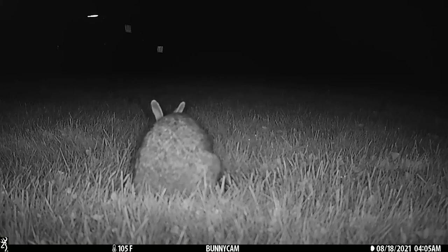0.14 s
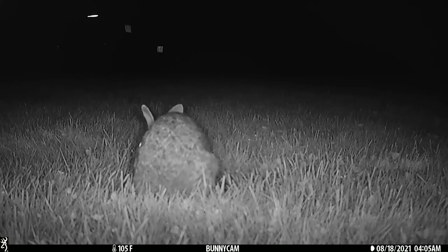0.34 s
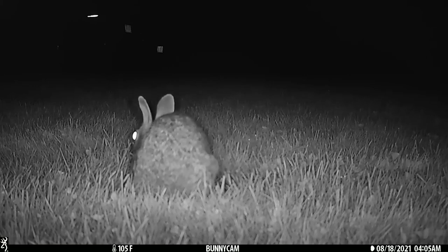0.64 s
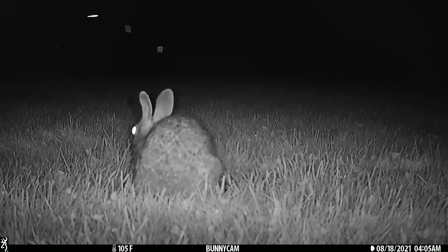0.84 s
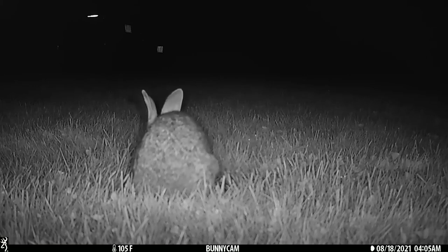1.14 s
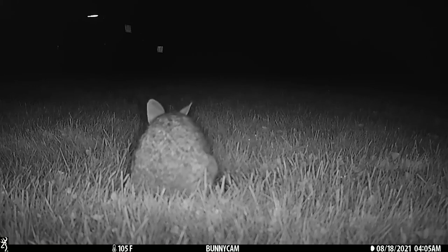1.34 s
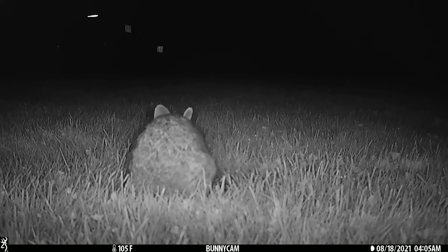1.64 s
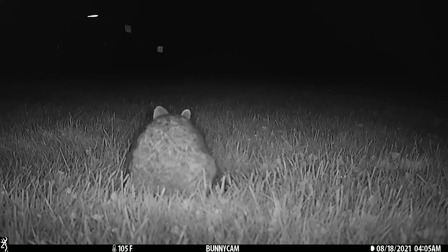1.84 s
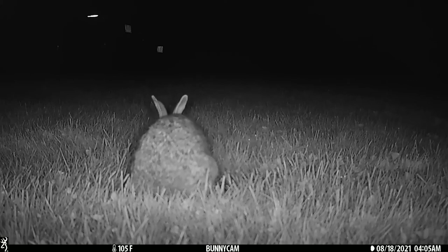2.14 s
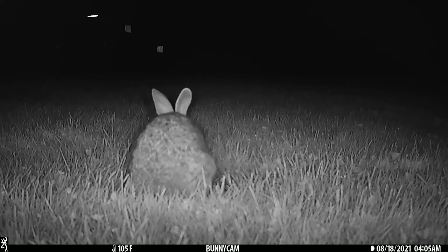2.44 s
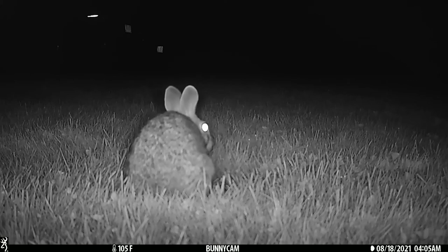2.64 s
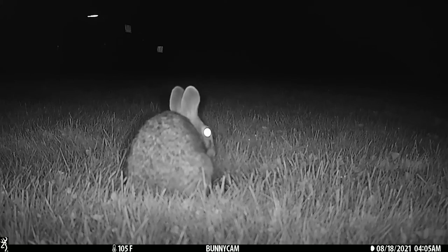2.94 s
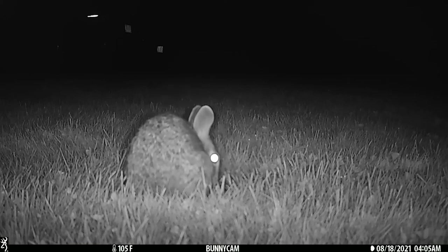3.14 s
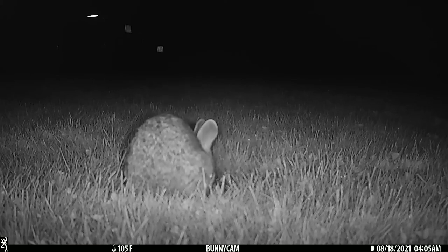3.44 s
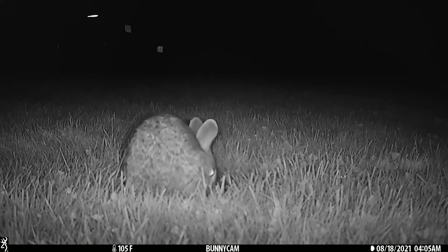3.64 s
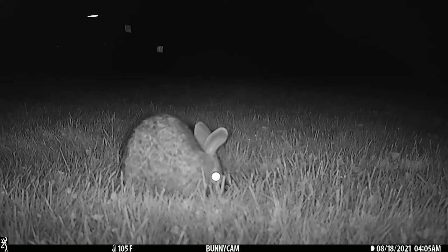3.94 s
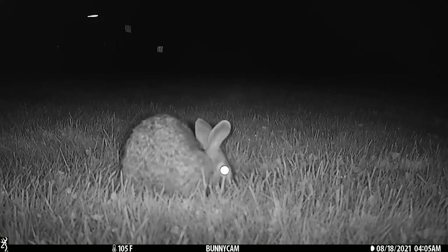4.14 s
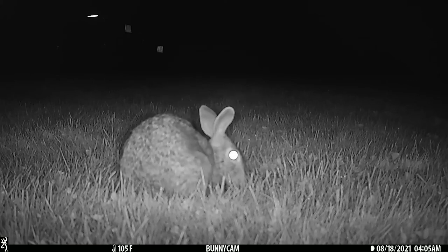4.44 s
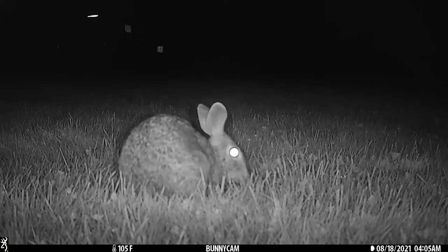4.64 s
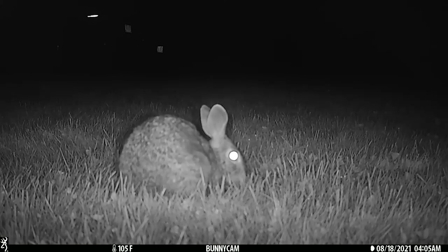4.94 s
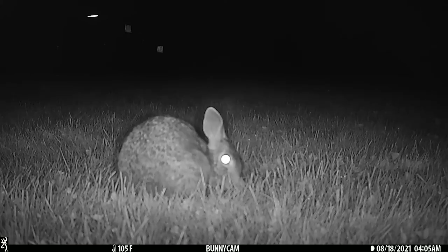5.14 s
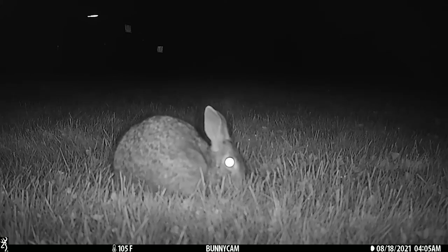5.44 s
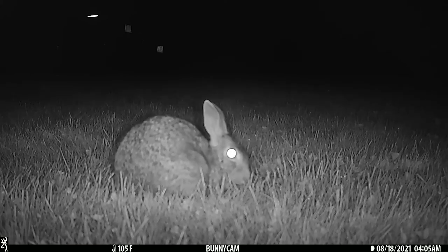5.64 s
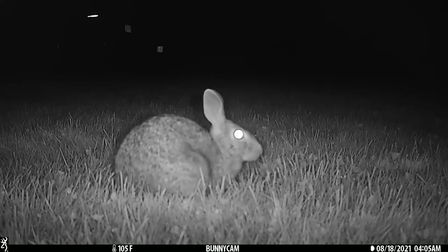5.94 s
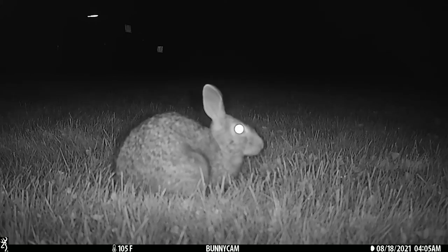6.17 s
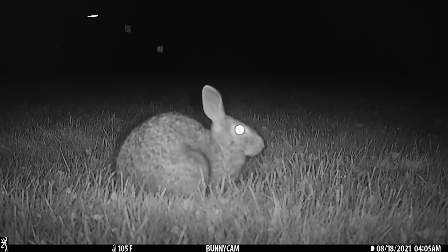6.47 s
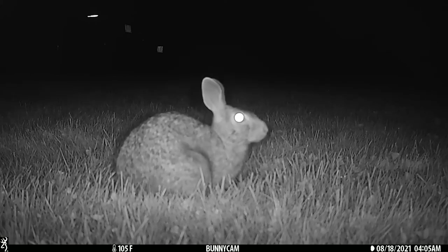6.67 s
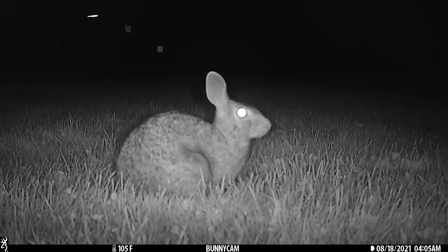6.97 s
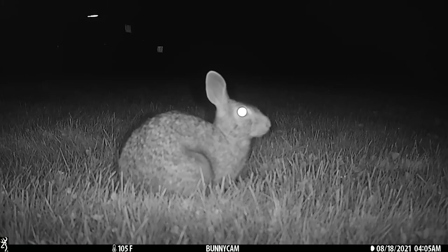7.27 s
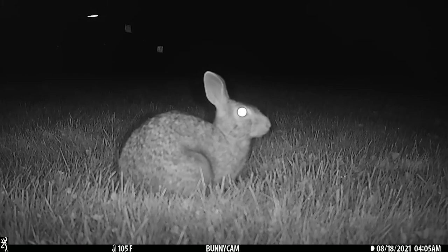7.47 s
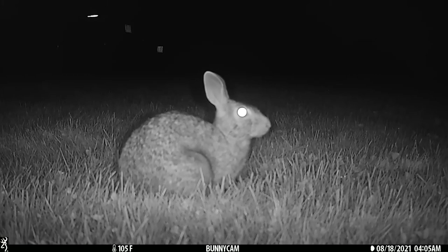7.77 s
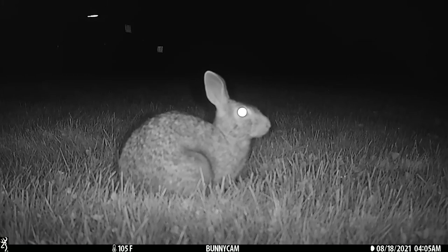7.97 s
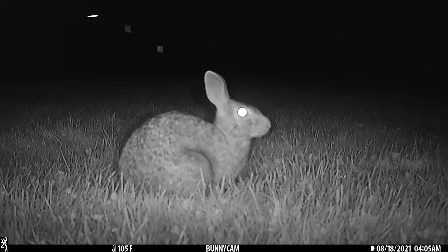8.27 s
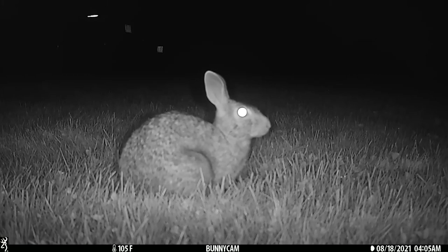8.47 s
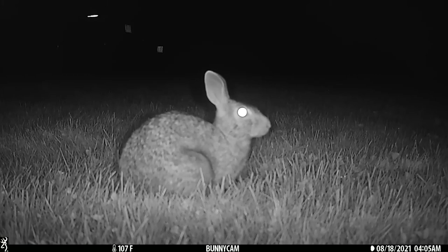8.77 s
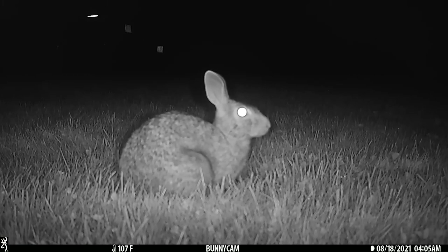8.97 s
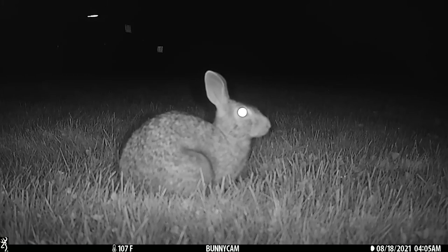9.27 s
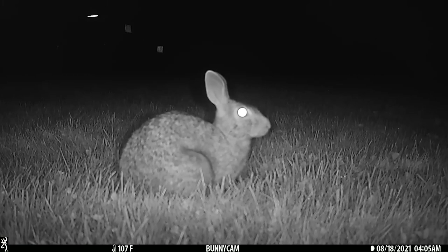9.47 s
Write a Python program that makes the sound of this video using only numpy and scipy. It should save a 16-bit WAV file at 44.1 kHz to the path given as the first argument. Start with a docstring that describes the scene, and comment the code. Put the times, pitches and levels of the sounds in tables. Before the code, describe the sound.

Steady bright cricket chirps on a night lawn, later doubled by a more distant cricket drifting in and out of step above faint hiss.

```python
"""A lawn at night, with crickets around a trail camera. A near field cricket chirps evenly, three strokes a chirp;
a second one joins farther off and drifts in and out of step, and a low-pitched one adds a few faint chirps.
Each stroke is a falling sine under a force envelope, with echoes or a diffuse tail. Behind are a distant chorus
(strokes over filtered noise), tree crickets (pulsing tones), a low rumble (filtered noise) and the camera's
hiss, buzz and whine (filtered noise and steady sines). This faint floor now and then sinks briefly."""
import sys
import numpy as np
from scipy import signal
from scipy.fft import rfft, irfft, next_fast_len
from scipy.io import wavfile

SR = 44100
rng = np.random.default_rng(int(sys.argv[2]) if len(sys.argv) > 2 else 0)


def output_pcm(signal):
    """Save a mono or channel-first signal as 16-bit PCM at the path in sys.argv[1].

    Samples are clipped to [-1, 1] before scaling.
    """
    pcm = np.clip(np.atleast_2d(signal).T, -1, 1) * 32767
    wavfile.write(sys.argv[1], SR, np.round(pcm).astype(np.int16))


N = 423801
TIME = np.arange(N) / SR


def from_db(db):
    """Logarithmic level: every 20 dB multiplies the amplitude by ten."""
    return 10 ** (np.asarray(db) / 20)


def rms_one(x):
    """Normalization of power: scale to unit rms."""
    return x / np.sqrt(np.mean(x ** 2) + 1e-20)


def colour(x, spectrum):
    """Linear filtering: weight x by a spectrum of (Hz, dB) points, joined on a log-frequency axis; rms 1."""
    hz, db = np.transpose(spectrum)
    bins = np.maximum(np.arange(N // 2 + 1) * SR / N, 1)
    gain = from_db(np.interp(np.log(bins), np.log(hz), db, left=-70, right=-70))
    return rms_one(irfft(rfft(x) * gain, N))


def drift(rate):
    """Random modulation: chance values of spread near 1, `rate` of them a second, joined by straight lines."""
    return np.interp(TIME * rate, np.arange(4096), rng.standard_normal(4096))


def add(out, start_s, sound):
    """Superposition: mix a sound into out, starting at a given time."""
    at = int(start_s * SR)
    if 0 <= at < N:
        out[at:at + len(sound)] += sound[:N - at]


def echoes(x, paths):
    """Multipath interference: delayed copies (ms, dB) add up, and on a falling pitch they beat together."""
    size = next_fast_len(N + SR)
    hz = np.arange(size // 2 + 1) * SR / size
    response = 0
    for delay_ms, db in paths:
        response = response + from_db(db) * np.exp(-2j * np.pi * hz * delay_ms / 1000)
    return irfft(rfft(x, size) * response, size)[:N]


def scatter(x, t60):
    """Diffuse scattering: grass, bushes and trees throw back a noise-like tail that decays 60 dB in t60 seconds."""
    t = np.arange(SR) / SR
    build_up = 1 - np.exp(-t / 0.039)
    tail = rng.standard_normal(SR) * from_db(-60 * t / t60) * build_up
    tail_of_unit_energy = tail / np.sqrt(np.sum(tail ** 2))
    return signal.fftconvolve(x, tail_of_unit_energy)[:N]


def stroke(pitch_hz, fall_hz, length_s, steady_share=0.4, swell=0.44):
    """Stridulation: the scraper catches at once, runs along the file and slows, most of all at the end."""
    way = np.linspace(0, 1, int(length_s * SR))
    slowing = steady_share * way + (1 - steady_share) * way ** 4
    hz = pitch_hz - fall_hz * slowing
    force = np.interp(way, [0, .03, swell, .8, 1], [0, .6, 1, .62, 0])
    return force * np.sin(2 * np.pi * np.cumsum(hz) / SR)


def near_cricket(length_s=0.0258, tail_db=-17):
    """Stridulation with multipath: three nearly pure falling strokes a chirp, cut into lobes by their echoes."""
    # The chirps. Each row: start in seconds, level in dB, usual starting pitch of its strokes in Hz.
    chirps = [(0.033, -37.5, 4372), (0.396, -37.5, 4400), (0.835, -37, 4432), (1.176, -37, 4412),
              (1.582, -36, 4402), (1.982, -36.5, 4445), (2.401, -36.5, 4396), (2.750, -37.5, 4404),
              (3.211, -37.5, 4380), (3.590, -37, 4403), (3.955, -36.5, 4360), (4.324, -37.5, 4454),
              (4.722, -36.5, 4432), (5.098, -38.3, 4406), (5.468, -36.9, 4337), (5.808, -37.5, 4400),
              (6.202, -38, 4370), (6.535, -37.5, 4397), (6.894, -37.5, 4415), (7.253, -37, 4335),
              (7.592, -36.5, 4407), (7.981, -37, 4467), (8.347, -37.8, 4382), (8.743, -36.5, 4404),
              (9.114, -37, 4353), (9.483, -38, 4410)]
    # The wing strokes of every chirp, the first softer. Each row: seconds after the chirp's start, added level in dB.
    chirp_shape = [(0, -0.5), (.045, 1), (.095, 0.8)]
    # Paths to the ear, direct and off nearby surfaces. Each row: delay in ms, level in dB.
    near_paths = [(0, 0), (5.31, -4.8), (7.26, -14.5), (10.26, -10.5), (12.79, -4.4), (16.07, -10.5),
                  (18.83, -8.2), (26.61, -14.1), (30.53, -15.7)]
    # A stroke that starts at the usual pitch has the usual fall; one that starts higher falls farther.
    usual_pitch_hz, usual_fall_hz, fall_per_hz = 4400, 483, 1.53
    stroke_scatter_hz = 36.3  # no two strokes start on quite the same pitch
    song = np.zeros(N)
    for start_s, chirp_db, chirp_hz in chirps:
        detunes_hz = rng.normal(0, stroke_scatter_hz, len(chirp_shape))
        for (after_s, stroke_db), detune_hz in zip(chirp_shape, detunes_hz):
            pitch_hz = chirp_hz + detune_hz
            fall_hz = usual_fall_hz + fall_per_hz * (pitch_hz - usual_pitch_hz)
            wing = stroke(pitch_hz, fall_hz, length_s)
            add(song, start_s + after_s, from_db(chirp_db + stroke_db) * wing)
    return echoes(song, near_paths) + from_db(tail_db) * scatter(song, t60=0.4)


def second_cricket(pitch_hz=4265, fall_hz=540, length_s=0.0262, gap_s=.05, first_db=-1.5, tail_db=-12):
    """Stridulation farther off: three lower strokes a chirp, the first softer, with a stronger diffuse tail."""
    # The chirps. Each row: start in seconds, level in dB.
    neighbour_chirps = [(2.303, -38.5), (2.743, -35), (3.239, -36), (3.668, -36.5), (4.16, -36.5),
                        (4.665, -38.5), (5.108, -38.5), (5.53, -37), (5.947, -37.5), (6.363, -37.5),
                        (6.996, -37), (7.419, -38), (7.84, -36.5), (8.263, -36.5), (8.696, -37),
                        (9.142, -37)]
    # Paths to the ear. Each row: delay in ms, level in dB.
    neighbour_paths = [(0, -3), (6.92, -19), (13.6, -11), (19.05, -11.5)]
    song = np.zeros(N)
    for start_s, chirp_db in neighbour_chirps:
        for k, detune_hz in enumerate(rng.normal(0, 19.0, 3)):
            wing = stroke(pitch_hz + detune_hz, fall_hz, length_s, steady_share=0.19, swell=0.64)
            add(song, start_s + k * gap_s, from_db(chirp_db + first_db * (k == 0)) * wing)
    return echoes(song, neighbour_paths) + from_db(tail_db) * scatter(song, t60=0.2)


def low_cricket(pitch_hz=3830, fall_hz=270, length_s=0.029, gap_s=0.045, tail_db=-4):
    """Stridulation far across the lawn: two soft, low strokes at a time, with a strong diffuse tail."""
    # The chirps. Each row: start in seconds, level in dB.
    low_chirps = [(7.510, -56), (8.243, -55.5), (9.007, -54.5), (9.545, -59)]
    song = np.zeros(N)
    for start_s, chirp_db in low_chirps:
        for k in range(2):
            add(song, start_s + k * gap_s, from_db(chirp_db) * stroke(pitch_hz, fall_hz, length_s))
    return song + from_db(tail_db) * scatter(song, t60=.3)


def far_crickets(pitch_hz=4430, spread_hz=130, period_s=.39, chirps_db=-58, blur_db=-55.5, swell_db=-0.5, count=5):
    """Incoherent superposition: a few distant singers, each at its own pace, over the noise-like blur of many."""
    # Field crickets blurred together. Each row: frequency in Hz, relative density in dB per Hz.
    chorus_spectrum = [(3400, -72), (3700, -17.5), (3950, 0.5), (4150, 2.5), (4300, 3.5), (4450, -4),
                       (4570, -6), (4700, -4), (4810, -24), (4950, -47)]
    song = np.zeros(N)
    offsets = rng.random(count)  # in periods
    paces = rng.uniform(.85, 1.15, count)
    for offset, pace, detune in zip(offsets, paces, np.linspace(-1, 1, count)):
        steps = rng.normal(1, .06, size=40)
        starts_s = (offset + np.cumsum(steps) - 1) * period_s * pace
        for start_s, waver_hz in zip(starts_s, rng.normal(0, 42.0, len(starts_s))):
            wing = stroke(pitch_hz + spread_hz * detune + waver_hz, fall_hz=362, length_s=0.0216)
            for k in range(3):
                add(song, start_s + k * .049, wing)
    chirps = rms_one(song + 0.48 * scatter(song, t60=0.28))
    blur = colour(rng.standard_normal(N), chorus_spectrum) * from_db(swell_db * drift(9))
    return from_db(chirps_db) * chirps + from_db(blur_db) * blur


def tree_crickets(waver_db=1.5, wander_rate=110, count=3):
    """Amplitude and frequency modulation: endless trills, wavering tones that pulse at the wing rate."""
    # Each row: pitch in Hz, pitch spread in Hz, pulses per second, depth of pulsing from 0 to 1, level in dB.
    trills = [(2349, 55, 50, 0.13, -66), (2486, 90, 61, 0.33, -66.5), (2627, 75, 61, 0.28, -66),
              (3020, 90, 47, 0.33, -68.5), (3094, 65, 17, 0.4, -69)]
    out = np.zeros(N)
    for pitch_hz, spread_hz, pulse_rate, depth, level_db in trills:
        tones = np.zeros(N)
        for _ in range(count):
            hz = pitch_hz + spread_hz * drift(wander_rate)
            tones += np.sin(2 * np.pi * np.cumsum(hz) / SR)
        wing_hz = pulse_rate * (1 + 0.0377 * drift(5))
        wings = 1 + depth * np.sin(2 * np.pi * np.cumsum(wing_hz) / SR)
        out += from_db(level_db + waver_db * drift(5.5)) * rms_one(tones * wings)
    return out


def camera_floor(air_db=-57.5, buzz_db=-72.5, flutter_db=2.57, repeat_share=0.8):
    """Gated noise: electronics, on for part of each cycle, lift the hiss and add a buzz; steady tones whine."""
    # Night air and microphone hiss. Each row: frequency in Hz, relative density in dB per Hz.
    air_spectrum = [(20, -12), (70, -7.5), (200, -5.5), (480, -1.5), (1250, -0.5), (2100, -3), (3400, -5.5),
                    (4900, -6), (5300, -4), (5700, -8.5), (6500, -13), (9800, -13.5), (11000, -23),
                    (11900, -18), (13500, -21.5), (15700, -22.5)]
    # Buzz of the electronics. Each row: frequency in Hz, relative density in dB per Hz.
    buzz_spectrum = [(4500, -9), (6300, 2), (9500, -2), (10800, -5.5), (15000, -18)]
    # Steady tones of the camera. Each row: frequency in Hz, rms level in dB.
    whine_tones = [(39.6, -85), (59.4, -96), (79.2, -91), (9608, -86), (9638, -84.5), (14442, -88)]
    cycle_hz = 58.72
    on = (TIME * cycle_hz + .87) % 1 < .4
    air = rms_one(colour(rng.standard_normal(N), air_spectrum) * from_db(flutter_db * on))
    # Part of each burst repeats one pattern, the rest is fresh; the shares are of power.
    pattern = np.resize(rng.standard_normal(round(SR / cycle_hz)), N)
    fresh = rng.standard_normal(N)
    bursts = on * (np.sqrt(repeat_share) * pattern + np.sqrt(1 - repeat_share) * fresh)
    buzz = colour(bursts, buzz_spectrum)
    whine = np.zeros(N)
    for hz, level_db in whine_tones:
        whine += from_db(level_db) * np.sqrt(2) * np.sin(2 * np.pi * (hz * TIME + rng.random()))
    return from_db(air_db) * air + from_db(buzz_db) * buzz + whine


def rumble():
    """Band-limited noise under a slow envelope: a faint low rumble from far away, which soon weakens."""
    # Each row: frequency in Hz, relative density in dB per Hz.
    rumble_spectrum = [(40, -17), (110, -3.5), (290, 0), (480, -2.5), (800, -22)]
    # Each row: time in seconds, level in dB.
    rumble_level = [(0, -70.5), (3, -72.5), (4.5, -77.5), (9.6, -76)]
    level_db = np.interp(TIME, *np.transpose(rumble_level))
    return from_db(level_db) * colour(rng.standard_normal(N), rumble_spectrum)


def dips():
    """Gain modulation in dB: the level sinks, stays down a moment and returns in a few hundredths of a second."""
    # Each row: middle of the dip in seconds, length from edge to edge in seconds.
    dip_times = [(2.369, .016), (3.627, .018), (3.798, .017), (4.204, .018), (4.417, .013), (5.249, .02),
                 (5.527, .018), (5.612, .018), (6.294, .017), (6.337, .015), (6.380, .017), (6.479, .042),
                 (6.614, .014), (6.657, .018), (6.971, .04), (7.041, .018), (7.446, .013), (7.745, .018),
                 (8.010, .043), (8.364, .018), (8.556, .018), (9.217, .018)]
    base_db, db_per_s = -5.5, -540  # the longer a dip lasts, the deeper it goes
    level_db = np.zeros(N)
    for middle_s, length_s in dip_times:
        # Each third of the length: down, hold, up.
        shape = np.clip(3 - np.abs(TIME - middle_s) / (length_s / 6), 0, 2) / 2
        level_db += (base_db + db_per_s * length_s) * shape
    return level_db


def scene(trill_share=0.039, low_share=0.49):
    """Superposition of singers and floor: dips cut the floor's treble most, barely touch trills, spare chirps."""
    floor = camera_floor() + rumble()
    dip_db = dips()
    low_pass = signal.butter(4, 4500, fs=SR, output="sos")
    low = signal.sosfiltfilt(low_pass, floor)
    treble = floor - low
    floor = low * from_db(low_share * dip_db) + treble * from_db(dip_db)
    chirps = near_cricket() + second_cricket() + low_cricket() + far_crickets()
    trills = tree_crickets() * from_db(trill_share * dip_db)
    return (chirps + trills + floor)[None]


def record(dry, notch_hz=5510, notch_width_hz=170, cutoff_hz=15750):
    """Receiver response: the small microphone has a narrow notch above the crickets' band; the top is cut."""
    b, a = signal.iirnotch(notch_hz, notch_hz / notch_width_hz, fs=SR)
    notched = signal.lfilter(b, a, dry)
    top_cut = signal.ellip(12, .1, 80, cutoff_hz, fs=SR, output="sos")
    return signal.sosfilt(top_cut, notched)


dry = scene()
out = record(dry)
output_pcm(out)
```